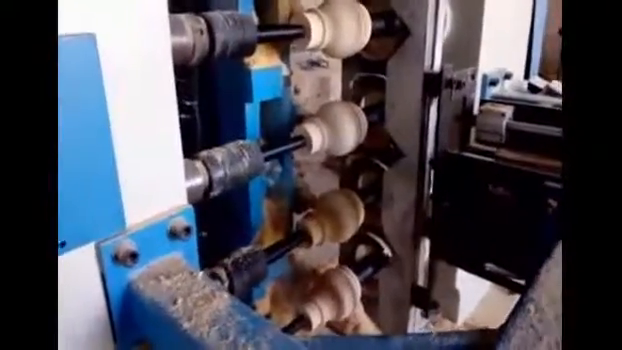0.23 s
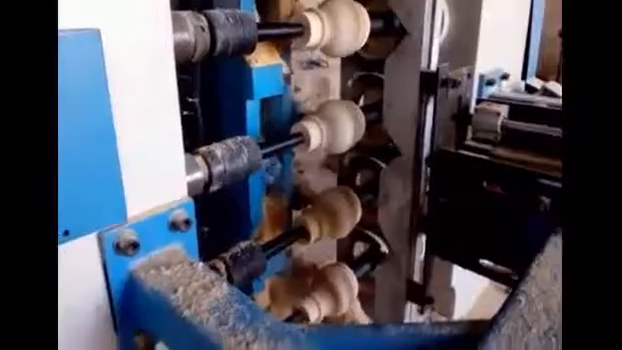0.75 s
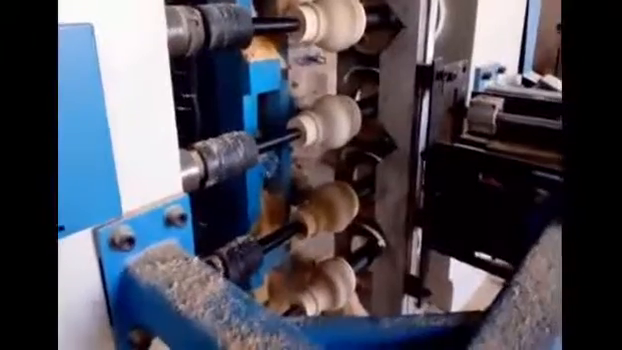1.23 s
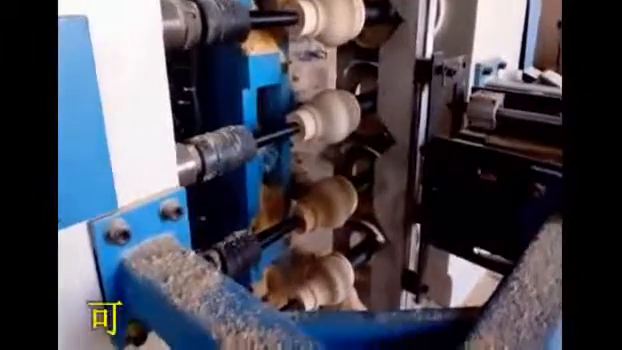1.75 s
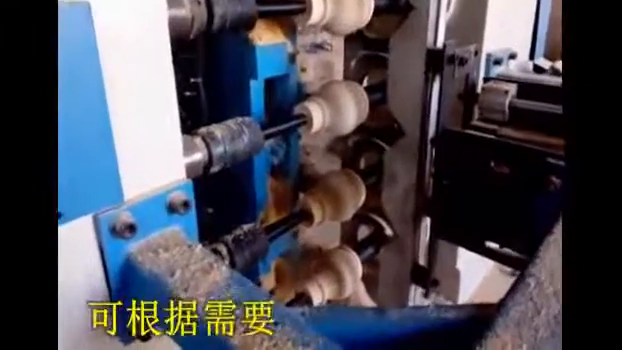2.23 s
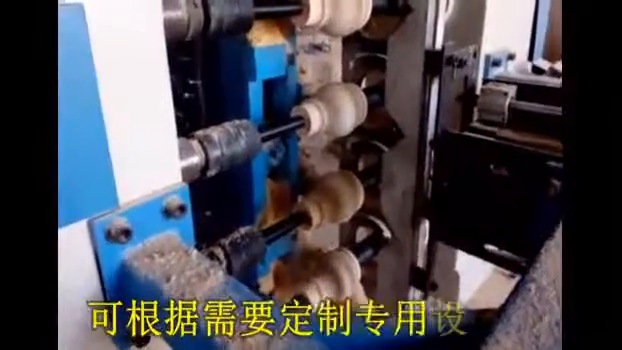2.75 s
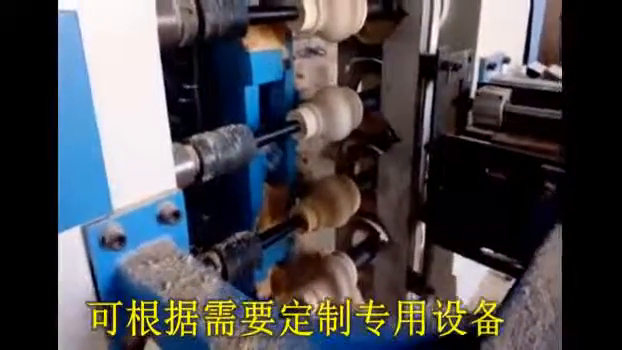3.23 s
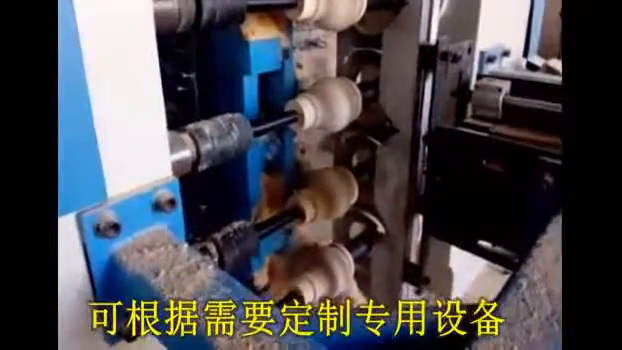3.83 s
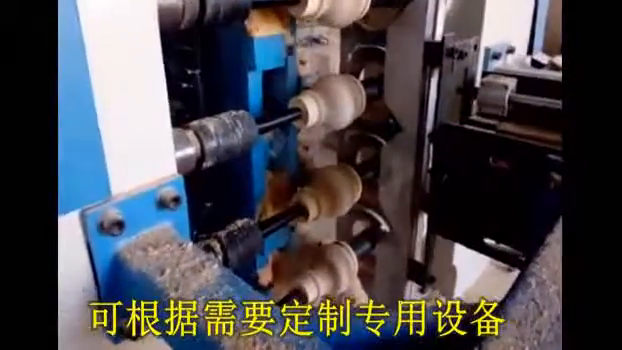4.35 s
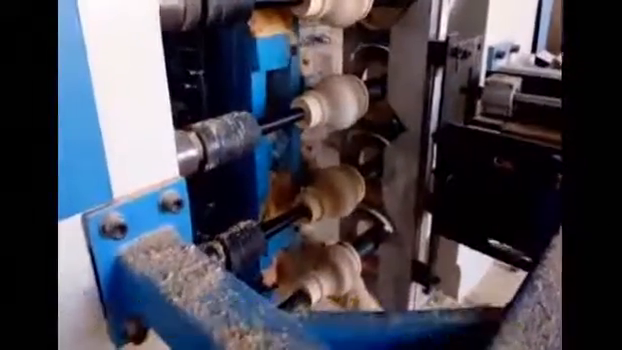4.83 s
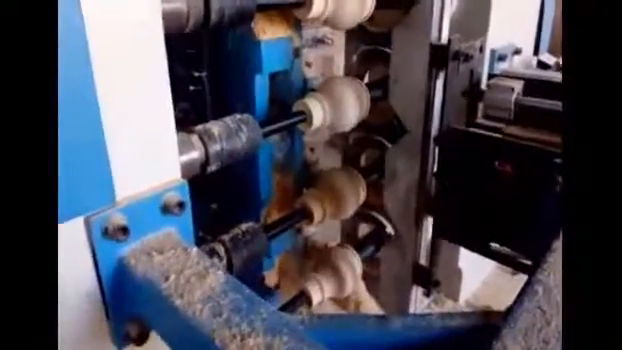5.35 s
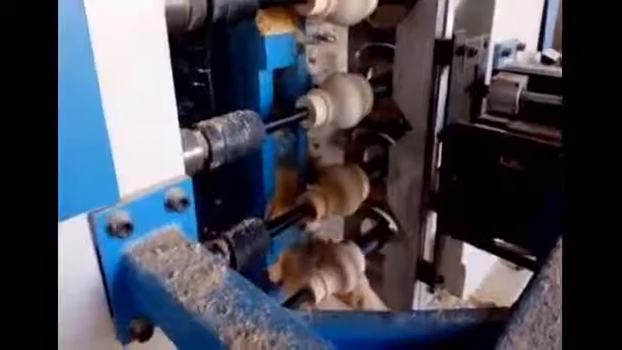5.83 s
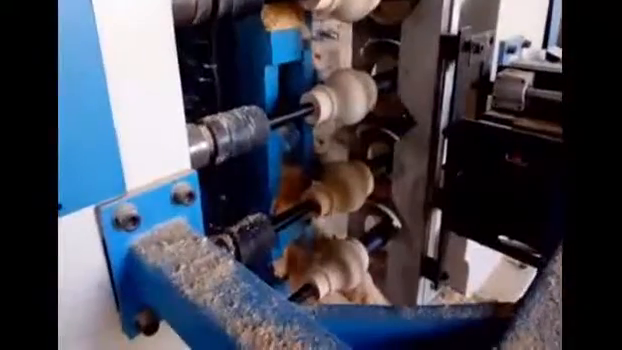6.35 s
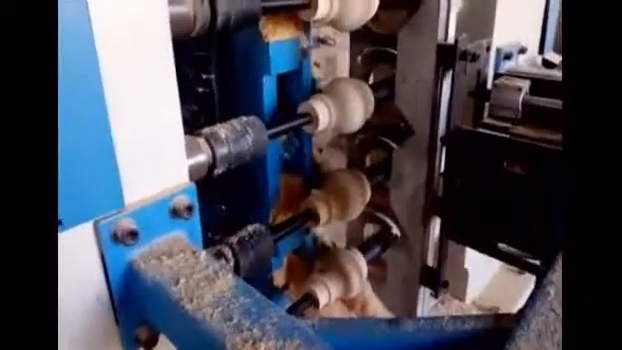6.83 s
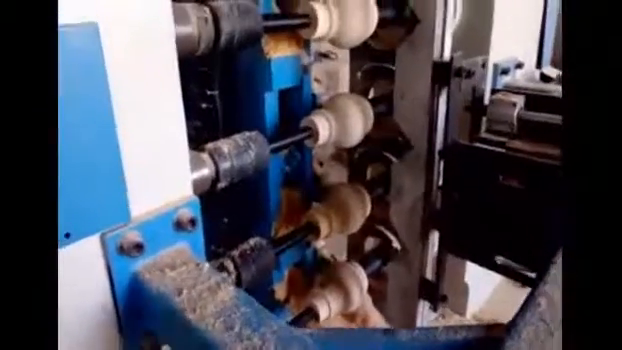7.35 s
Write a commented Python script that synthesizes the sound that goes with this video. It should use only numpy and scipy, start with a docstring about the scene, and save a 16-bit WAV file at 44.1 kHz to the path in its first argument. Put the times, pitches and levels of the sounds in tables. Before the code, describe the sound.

A multi-spindle lathe cuts wood in a workshop, heard close up. A high, fluttering whine runs throughout, over a harsh rasp of knives, a hiss of air and a low, throbbing rumble. Midway the machine sinks a little while the hiss grows. Near the end the rasp and the air stop, and the spindles run free with a louder whine and a few dull knocks.

```python
"""A beating whine and a rasp of knives on wood sound over the rumble of a multi-spindle lathe.
Two cutter spindles at nearly the same pitch make the beats; an air blast hisses, and the steel housing
colours the noise. The frame thumps once a lap of the belt, and all but the air sinks for a while
mid-way. The whine's phase wanders between left and right. Near the end the cut finishes,
the air shuts off and the spindles run free."""
import sys
import numpy as np
from scipy import signal
from scipy.fft import rfft, irfft, next_fast_len
from scipy.io import wavfile
from scipy.ndimage import uniform_filter1d, map_coordinates

SR = 44100
rng = np.random.default_rng(int(sys.argv[2]) if len(sys.argv) > 2 else 0)


def materialize(psi):
    """Save the field psi as 16-bit PCM at rate SR to the path in sys.argv[1].

    A 1-D psi becomes a single channel; in a 2-D psi each row is a channel.
    """
    bounded = np.clip(np.atleast_2d(psi).T, -1, 1)
    quanta = np.round(bounded * 32767).astype(np.int16)
    wavfile.write(sys.argv[1], SR, quanta)


N = 335160
TIME = np.arange(N) / SR
TOP_HZ = 11150


def amp(db):
    """Amplitude grows tenfold for every 20 dB."""
    return 10 ** (np.asarray(db) / 20)

def unit(x):
    """Normalisation to an rms of 1."""
    return x / np.sqrt(np.mean(x ** 2) + 1e-20)

def curves(rows):
    """Linear interpolation in time: one curve for each column after the first."""
    times, *columns = np.transpose(rows)
    return [np.interp(TIME, times, column) for column in columns]

def wobble(rate):
    """Smooth random modulation: a spline through `rate` random knots a second."""
    knots = rng.standard_normal(1024)
    coarse = np.arange(0, N + 64, 64)
    return np.interp(np.arange(N), coarse, map_coordinates(knots, [coarse * rate / SR], mode="wrap"))

def cycle(hz):
    """Phase is the time integral of frequency."""
    return 2 * np.pi * np.cumsum(hz) / SR

def noise():
    """A diffuse field, as in a hard-walled shop: white noise unrelated at the two ears."""
    return rng.standard_normal((2, N))

def filtered(x, response):
    """Linear filtering multiplies the spectrum by a frequency response."""
    size = next_fast_len(N + 8192)
    return irfft(rfft(x, size) * response(np.fft.rfftfreq(size, 1 / SR)), size)[..., :N]

def ring(modes):
    """Randomly driven resonances add in power. Each mode: frequency in Hz, half-width in Hz, dB."""
    def peak(f, hz, width, db):
        return amp(db) * np.sqrt(SR / (np.pi * width)) / (1 + ((f - hz) / width) ** 2)
    return filtered(noise(), lambda f: np.sqrt(sum(peak(f, *mode) ** 2 for mode in modes)))

def patched(x, gain, patch_hz, patch_s):
    """Time-varying filtering: the gain follows a smooth random field over frequency and time."""
    frames = dict(fs=SR, nperseg=2048, noverlap=1366)
    hz, t, spectra = signal.stft(x.astype(np.float32), **frames)
    heard = hz < TOP_HZ + 300
    where = np.meshgrid(hz[heard] / patch_hz, t / patch_s, indexing="ij")
    field = map_coordinates(rng.standard_normal((512, 128)), where, mode="wrap")
    shaped = spectra[..., heard, :] * gain(field).astype(np.float32)
    return signal.istft(shaped, nfft=2048, **frames)[1][..., :N]

def combed(x, depth_db, patch_hz, patch_s):
    """An irregular comb filter: neighbouring bands trade power, so the loudness stays even."""
    def gain(field):
        contrast = field - uniform_filter1d(field, size=11, axis=0)
        power = amp(2 * depth_db * np.tanh(contrast))
        return np.sqrt(power / uniform_filter1d(power, size=17, axis=0))
    return patched(x, gain, patch_hz, patch_s)

def engaged(fade_s, cut_end_s=7.09):
    """A smooth gate: 1 during the cut, 0 after it."""
    return .5 - .5 * np.tanh((TIME - cut_end_s) / fade_s)

def freed(start_s=6.9, end_s=7.03):
    """Unloading as a linear ramp: 0 while the knives are loaded, 1 once they run free."""
    return np.clip((TIME - start_s) / (end_s - start_s), 0, 1)

# The machine sinks mid-way and climbs as the cut ends. Each row: time in seconds, level in dB.
MACHINE_LEVEL = [(0, -0.5), (2.3, -0.7), (3.4, -1), (4.4, -3), (5.1, -7.5), (5.7, -7), (6.35, -4),
                 (6.75, -3), (6.95, 1.5), (7.3, 4), (7.6, 4.5)]
def follow(db, share):
    """Common modulation: a layer's gain moves `share` dB for each dB of the machine's level."""
    return amp(db + share * curves(MACHINE_LEVEL)[0])

# Modes of the steel housing. Each row: frequency in Hz, bandwidth in Hz, lift in dB.
HOUSING_MODES = [(1459, 108, 4.0), (1721, 107, 3.9), (2030, 46, 3.7), (2282, 62, 4.8), (2418, 137, 4.4),
                 (2934, 121, 4.3), (3247, 170, 4.8), (3475, 170, 5.8), (3695, 150, 4.5), (3960, 166, 4.0),
                 (4080, 120, 3.2), (4280, 80, -3), (4470, 99, 3.2), (4595, 150, 4.0), (4750, 80, -3),
                 (4900, 170, 4.6), (5080, 100, 4.6), (5406, 170, 1.8), (5581, 170, 2.3), (5979, 35, 3.7),
                 (6085, 167, 4.3), (6283, 35, 2.5), (6580, 170, 4.2), (7072, 46, 2.2), (7660, 170, 2.1),
                 (8237, 131, 2.5)]
def housed(x, spectrum):
    """Source and filter: x takes on a spectrum and the housing's resonances, at an rms of 1."""
    knots_hz, level_db = np.transpose(spectrum)
    grid = np.arange(1, SR / 2, 2)
    source_db = np.interp(np.log(grid), np.log(knots_hz), level_db)
    peaks_db = sum(db / (1 + (2 * (grid - hz) / width) ** 2) for hz, width, db in HOUSING_MODES)
    return unit(filtered(x, lambda f: np.interp(f, grid, amp(source_db + peaks_db))))

# Spectrum of the frame's rumble. Each row: frequency in Hz, relative density in dB.
FRAME_SPECTRUM = [(10, -31), (24, -12), (45, -13), (90, -8.5), (145, 0), (200, -2), (255, -2), (290, -6.5),
                  (320, -5.5), (370, -12), (490, -15.5), (680, -18), (800, -30.5), (1600, -39)]
def frame_rumble(shaft, pulley_hz=41.62, turns_per_lap=4, thump_db=3):
    """Forced vibration: the frame throbs with the shaft, the motor pulley and the belt's joint."""
    pulley = cycle(pulley_hz + .5 * wobble(3.09))
    throb = 1 + 0.073 * np.cos(shaft) + 0.037 * np.cos(pulley) + 0.099 * np.cos(2 * pulley)
    thump = np.exp(4.5 * (np.cos(pulley / turns_per_lap) - 1))  # one pulse a lap of the belt
    shudder = amp(thump_db * thump + 1.5 * wobble(16))
    return follow(-24.5, share=0.57) * unit(housed(noise(), FRAME_SPECTRUM) * throb * shudder)

# Tones of the drive. Each row: frequency in Hz, relative level in dB.
HUM_LINES = [(71, -51.5), (74.3, -37.5), (148.6, -49), (167, -44.5), (252, -37.5)]
def drive_hum():
    """Periodic motion gives a line spectrum: belts and motors hum in slightly wavering tones."""
    def line(hz, db):
        strength = np.sqrt(2) * amp(db + 1.3 * wobble(3.46))
        return strength * np.sin(cycle(hz * (1 + 0.00977 * wobble(7))))
    ears = np.array([sum(line(hz, db) for hz, db in HUM_LINES) for _ in range(2)])
    return follow(1.5, share=1.56) * ears

# Blows in the drive. Each row: start in seconds, relative level in dB.
BLOWS = [(1.049, -15), (4.948, -21), (5.049, -22), (5.145, -19), (7.342, -8), (7.483, -11), (7.579, -13)]
# Low modes of the frame. Each row: frequency in Hz, relative level in dB, seconds to fall 60 dB.
FRAME_MODES = [(165, 1.5, 0.055), (259, -3, .05)]
def knocks(gain_db=4, attack_s=.005):
    """Impulse response: each dull blow in the drive leaves the frame's modes to decay freely."""
    t = np.arange(SR // 8) / SR
    modes = sum(amp(db - 60 * t / t60) * np.sin(2 * np.pi * hz * t) for hz, db, t60 in FRAME_MODES)
    thud = (1 - np.exp(-t / attack_s)) * modes
    out = np.zeros(N + SR)
    for start, db in BLOWS:
        out[round(start * SR):][:len(t)] += amp(db + gain_db) * thud
    return out[:N]

# Spectrum of the machine's wash. Each row: frequency in Hz, relative density in dB.
WASH_SPECTRUM = [(400, -76), (850, -8), (1400, -9), (1850, -7), (2150, -0.5), (2450, -2.5), (3000, -6),
                 (3600, -10), (5500, -7), (5900, -19.5), (8000, -21), (8900, -58), (10500, -25)]
def machine_wash(patchy_db=8.5, free_db=-4.5):
    """Random spectral modulation: a machine wash whose narrow bands flicker."""
    flickering = patched(noise(), lambda field: amp(patchy_db * np.tanh(field)),
                         patch_hz=44.95, patch_s=.045)
    level_db = -24.5 + free_db * freed() + 0.96 * wobble(6.6)
    return follow(level_db, share=0.81) * housed(flickering, WASH_SPECTRUM)

# Resonances of the bearings. Each row: frequency in Hz, half-width in Hz, relative level in dB.
BEARING_MODES = [(5978, 28, -42.5), (6087, 33, -42.5), (9636, 26, -42.5), (10216, 14, -42.5),
                 (10692, 32, -43.5)]
def bearing_rings(idle_gain=0.11):
    """Narrow resonance: the bearings ring thinly under load and only faintly without it."""
    return (idle_gain + engaged(fade_s=.03)) * ring(BEARING_MODES)

# Brief squeals and long rings. Each row: time of the peak in seconds, seconds to fall to 1/e,
# frequency in Hz, half-width in Hz, level in dB.
SWELLS = [(.2, .7, 3710, 45, -31), (0.297, 0.65, 1454, 75, -36.5), (.55, .25, 3450, 20, -32),
          (.87, .04, 4630, 40, -24), (1.9, 1.4, 4630, 55, -29), (2.038, .025, 5150, 25, -24),
          (2.045, .03, 4600, 25, -23), (2.0, 1.2, 3670, 43, -32), (2.492, .025, 5050, 90, -22),
          (4.066, 0.17, 635, 41, -32), (4.2, 0.43, 3230, 53, -32.5), (4.252, .08, 95, 11, -28.5),
          (4.762, 0.024, 3690, 22, -25), (4.763, .028, 4260, 43, -27), (4.776, .04, 5510, 30, -25),
          (5.4, .6, 5450, 100, -33), (6.4, 0.61, 4500, 40, -34), (7.4, 0.33, 3220, 50, -32.5)]
def groans():
    """Resonance: single modes swell and fade as the knives travel along the blanks."""
    return sum(np.exp(-((TIME - peak_s) / fade_s) ** 2) * ring([mode])
               for peak_s, fade_s, *mode in SWELLS)

# Strength of the air blast. Each row: time in seconds, relative level in dB.
BLAST_LEVEL = [(0.1, -31.5), (2.44, -35), (4.6, -27), (6.75, -30), (7.0, -36)]
# Spectrum of its hiss. Each row: frequency in Hz, relative density in dB.
BLAST_SPECTRUM = [(1500, -63), (3500, -40), (5400, -2), (6900, -7), (8000, 2), (9000, 2.5), (10000, 5),
                  (10800, 10.5), (11200, -1)]
def air_blast(gain_db=4.5):
    """Jet noise: the air that blows the chips away hisses until the cut ends."""
    strength = amp(curves(BLAST_LEVEL)[0] + gain_db + 0.86 * wobble(18))
    jet = combed(noise(), depth_db=7, patch_hz=47.88, patch_s=.06)
    return engaged(fade_s=0.019) * strength * housed(jet, BLAST_SPECTRUM)

# A deep cut, a light one, then a finishing pass. Each row: time in seconds, rasp level in dB.
RASP_LEVEL = [(0, -19), (2.8, -18), (3.87, -19.5), (3.93, -22.5), (4.45, -21.5), (5.2, -24), (5.75, -22),
              (6.35, -19.5), (6.56, -21), (6.8, -20), (7.05, -22)]
# Spectrum of the rasp. Each row: frequency in Hz, relative density in dB.
RASP_SPECTRUM = [(250, -14.5), (550, -10.5), (700, -3.5), (820, -20.5), (1300, -20), (2200, -4),
                 (3000, -3.5), (3600, -0.5), (4500, 1), (5500, 1), (6100, -4), (6900, -6.5), (8500, -9),
                 (11000, -6.5)]
def knife_rasp(shaft):
    """Amplitude modulation: knives bite once a shaft turn; the rasp has a fine, fast, watery shimmer."""
    bite = 1 + 0.025 * np.cos(shaft / 2) + 0.064 * np.cos(shaft)
    shimmer = combed(noise(), depth_db=14, patch_hz=50, patch_s=.07)
    strength = amp(curves(RASP_LEVEL)[0] + 0.13 * wobble(9))
    # Echoes from near walls make a slowly drifting comb.
    echoed = combed(shimmer, depth_db=4, patch_hz=55, patch_s=.9)
    return engaged(fade_s=0.037) * strength * bite * housed(echoed, RASP_SPECTRUM)

# Thin overtones of the spindles. Each row: frequency in Hz, half-width in Hz, relative level in dB.
SPINDLE_MODES = [(2054, 8.8, -43), (2330, 9, -42.5), (3170, 10, -43), (3460, 9.3, -43), (4250, 4.7, -43),
                 (4430, 7.7, -45)]
def spindle_overtones(loaded_db=-2.5, free_db=5.5):
    """Lightly damped resonances of the spindles grow and stand out as the load comes off."""
    return amp(loaded_db + (free_db - loaded_db) * freed()) * ring(SPINDLE_MODES)

# The spindles' whine. Each row: time in seconds, level in dB, lower spindle against the upper in dB.
WHINE_LEVELS = [(0, -27, -6), (.2, -25, -7), (.65, -25.5, -5), (1.25, -26, -6), (1.55, -26.5, -3),
                (2.15, -24, -6), (2.45, -22, -8), (2.57, -28, -6), (2.77, -22.5, -6), (2.9, -28, -6),
                (3.05, -26.5, -18), (3.45, -23, -7), (3.68, -26.5, -7), (3.92, -30, -12),
                (4.12, -24.5, -13), (4.55, -28.5, -10), (5.2, -29, -7), (5.6, -31, -7), (6.12, -28, 1),
                (6.33, -24, -1), (6.7, -25.5, -1), (7.09, -22, -2), (7.18, -26.5, -3), (7.33, -16.5, -4),
                (7.43, -21, -4), (7.51, -17, -4), (7.6, -18.5, -4)]
def spindle_whine(shaft, upper_hz=2633.5, beat_hz=30.8, free_rise_hz=11.8, flutter_db=1.76):
    """Beats: two spindles a little apart in pitch interfere, most deeply in the finishing pass."""
    level_db, lower_db = curves(WHINE_LEVELS)
    strain = 1 - 0.25 * freed()  # the cut roughens the tone
    rise_hz = free_rise_hz * (1 - engaged(fade_s=0.19))  # they speed up as the knives leave the wood
    upper = cycle(upper_hz + rise_hz + 2.82 * wobble(2) + 2.48 * wobble(14))
    beat = cycle(beat_hz + wobble(12))
    pair = np.exp(1j * upper) * (1 + amp(lower_db) * np.exp(-1j * beat))
    pair /= np.sqrt(1 + amp(2 * lower_db))
    # Uneven bites shake strength and phase.
    scatter = 1 + 0.51 * strain * np.array([wobble(85) + 1j * wobble(85) for _ in range(2)])
    wander = np.exp(1j * np.array([[1], [-1]]) * wobble(6))  # the phase wanders between left and right
    chatter = 1 + 0.13 * strain * np.cos(shaft)
    grain = amp(flutter_db * wobble(15))  # swells and dips with the grain of the wood
    tone = unit((pair * scatter * wander).real * chatter * grain)
    skirt = ring([(2623, 47, -3.5)])  # the bites smear the pitch
    return amp(level_db) * (tone + strain * skirt)

# Dip of the low middle. Each row: time in seconds, gain before flicker in dB.
MIDDLE_DIP = [(0, -0.5), (2.8, -0.5), (3.4, -1.5), (4.05, 0.5), (4.6, -2.5), (4.98, -4.5), (5.33, -0.5),
              (5.68, -3), (5.8, -7), (5.92, -1.5), (6.3, -1.5), (6.9, -1.5)]
def hollowed(x, centre_hz=1030, half_width_hz=330, flicker=1.2):
    """Band attenuation: the low middle thins out and flickers, most between 4.5 and 6 s."""
    dip_db = curves(MIDDLE_DIP)[0] * np.maximum(1 + flicker * wobble(22), 0)
    middle = filtered(x, lambda f: np.exp(-((f - centre_hz) / half_width_hz) ** 4))
    return x + (amp(dip_db) - 1) * middle

# Balance between the ears. Each row: frequency in Hz, left over right in dB.
BALANCE = [(100, -0.5), (600, -0.1), (1200, -2.5), (2600, -1.5), (3600, -0.5), (6000, -1), (7500, 1.5),
           (8500, 2.5), (10800, 5.5)]
def placed(x):
    """Interaural level difference puts the spindles to the right and the air nozzle to the left."""
    knots_hz, lean_db = np.transpose(BALANCE)
    def ear_gains(f):
        difference_db = np.interp(np.log(f + 1), np.log(knots_hz), lean_db)
        return amp(np.outer([.5, -.5], difference_db))
    return filtered(x, ear_gains)

def scene():
    """Superposition: the sources add, with rumble, rasp and whine pulsing to one cutter shaft."""
    shaft = cycle(hz=74 + .12 * wobble(5))
    drive = frame_rumble(shaft) + drive_hum() + knocks()
    cutting = machine_wash() + knife_rasp(shaft) + air_blast() + bearing_rings() + groans()
    spindles = spindle_whine(shaft) + spindle_overtones()
    return placed(hollowed(drive + cutting + spindles))

def record(dry):
    """Band limiting: a steep low-pass filter removes the treble above TOP_HZ."""
    return filtered(dry, lambda hz: .5 - .5 * np.tanh((hz - TOP_HZ) / 50))


dry = scene()
out = record(dry)
materialize(out)
```